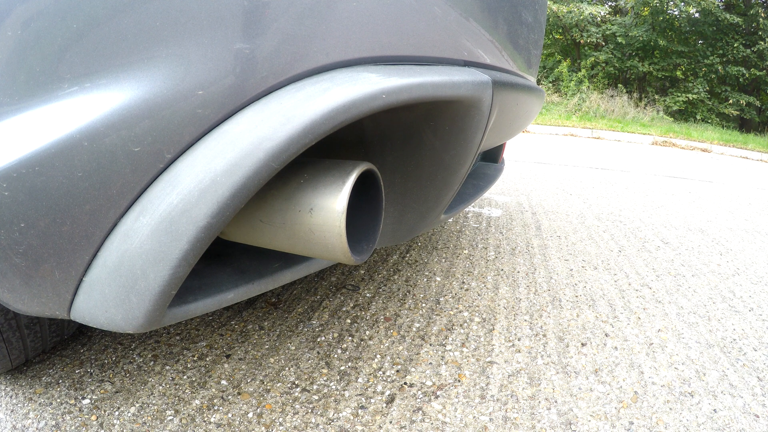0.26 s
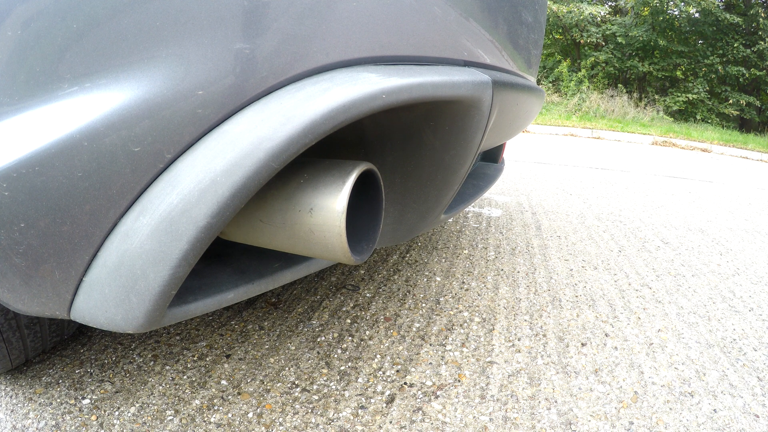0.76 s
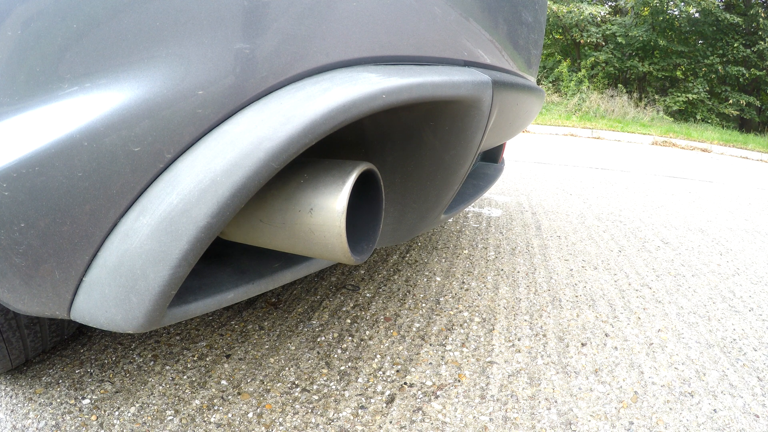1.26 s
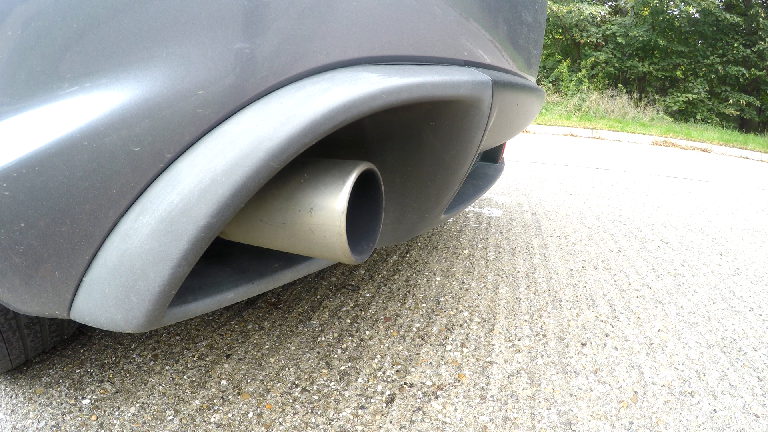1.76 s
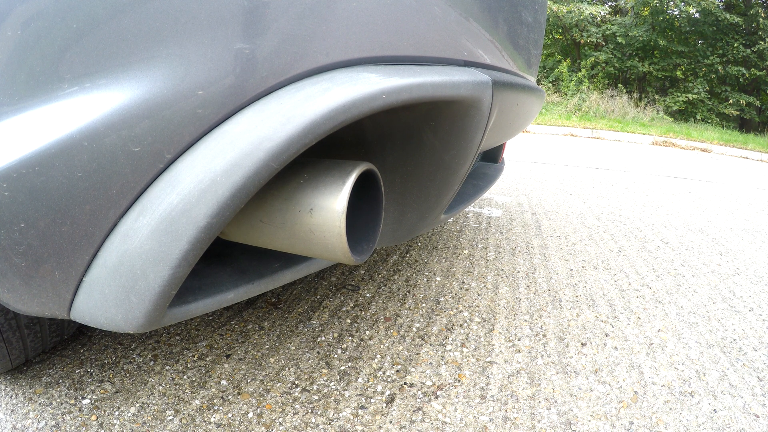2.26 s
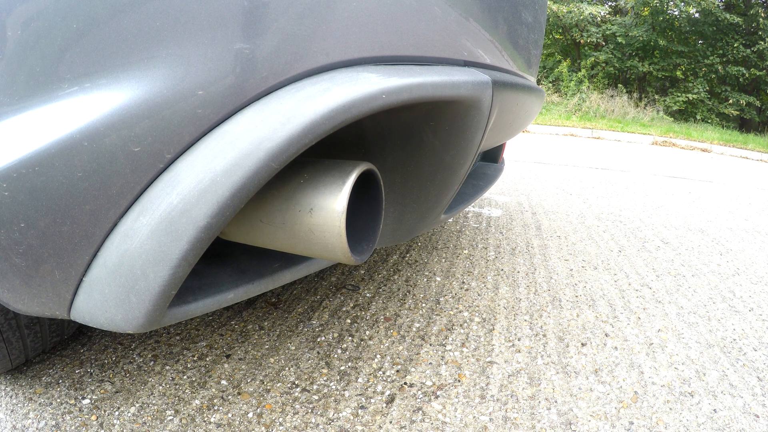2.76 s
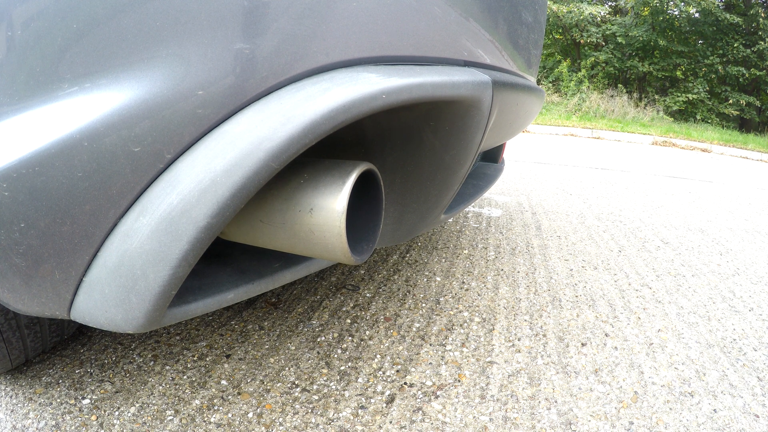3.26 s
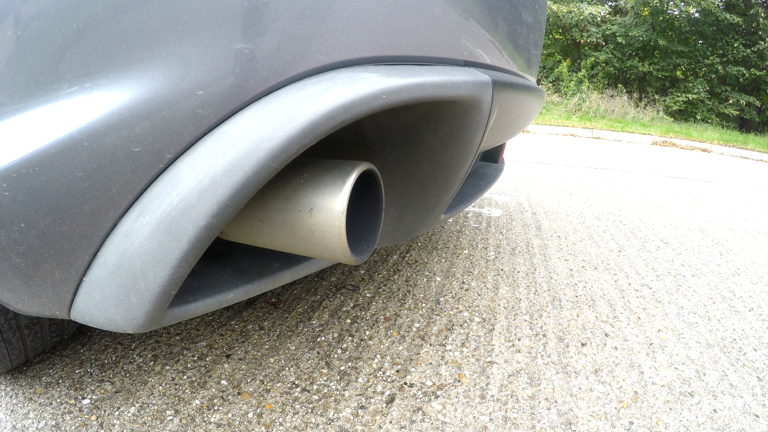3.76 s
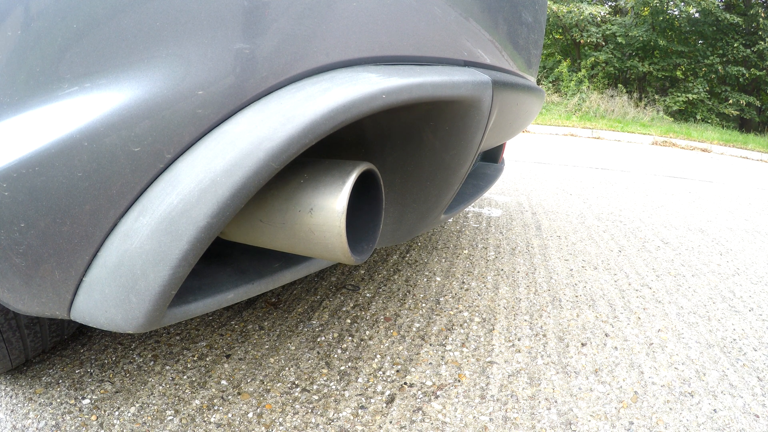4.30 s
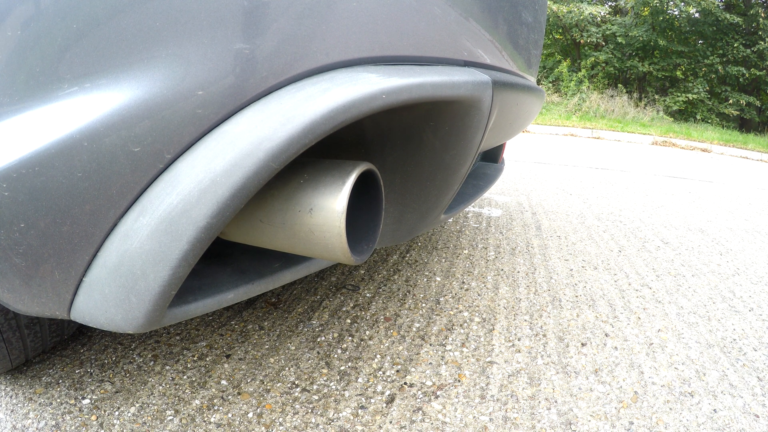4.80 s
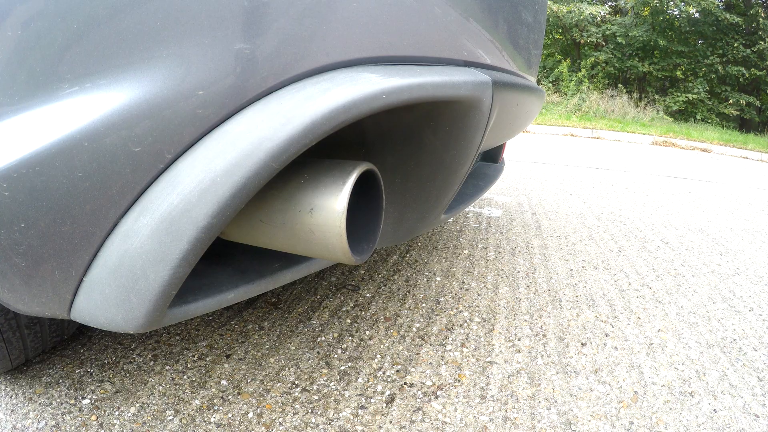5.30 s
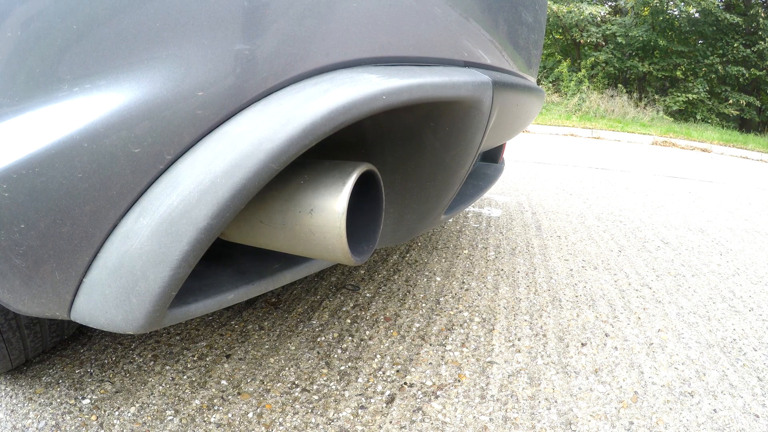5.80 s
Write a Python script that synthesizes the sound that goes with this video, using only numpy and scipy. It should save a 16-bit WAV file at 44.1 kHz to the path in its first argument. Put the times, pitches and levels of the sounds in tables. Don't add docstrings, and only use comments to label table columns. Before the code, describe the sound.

Right beside a car's tailpipe on an open driveway, a deep, uneven idle throbs with small puffs and spits. After just over a second the throttle is blipped: a thump, then a loud raspy bark rising fast. It falls away with a rough, hissing, stuttering overrun and by three seconds settles back to quiet, lumpy idle. Dry, close small-camera microphone.

```python
import sys
import numpy as np
from scipy import signal
from scipy.fft import rfft, irfft, next_fast_len
from scipy.io import wavfile
from scipy.ndimage import uniform_filter1d

SR = 44100
rng = np.random.default_rng(int(sys.argv[2]) if len(sys.argv) > 2 else 0)


def gain_from_decibels(decibels):
    exponent = np.asarray(decibels, float) / 20
    return 10 ** exponent


def wrap_up_sound(samples):
    columns = np.atleast_2d(samples).T
    tamed = np.clip(columns, -1, 1)
    steps = np.round(tamed * 32767).astype(np.int16)
    wavfile.write(sys.argv[1], SR, steps)


N = 266584


def rms_one(x):
    return x / np.sqrt(np.mean(x ** 2) + 1e-20)


def in_time(rows):
    s, *columns = np.transpose(rows)
    return [np.interp(np.arange(N) / SR, s, column) for column in columns]


def at_hz(points, hz):
    point_hz, point_db = np.array(points).T
    return np.interp(np.log(hz), np.log(point_hz), point_db)


def drift(rate_hz):
    r = np.exp(-80 * np.pi * rate_hz / SR)
    noise = rng.standard_normal(N // 40 + 2002)
    slow = signal.lfilter([1], [1, -2 * r, r * r], noise)[2000:]
    return np.interp(np.arange(N) / 40, np.arange(len(slow)), rms_one(slow))


def resonance(x, hz, width_hz):
    r = np.exp(-np.pi * width_hz / SR)
    zeros = np.array([1, 0, -1]) * (1 - r * r) / 2
    poles = [1, -2 * r * np.cos(2 * np.pi * hz / SR), r * r]
    return signal.lfilter(zeros, poles, x + 1e-18)


def coloured_noise(spectrum, patchy_db):
    size = next_fast_len(N)
    hz = np.maximum(np.fft.rfftfreq(size, 1 / SR), 1)
    shaped = rfft(rng.standard_normal(size)) * gain_from_decibels(at_hz(spectrum, hz)) * (hz > 20)
    octave = np.floor(np.log2(hz / 30)).clip(0, 8)
    out = np.zeros(N)
    for k in range(9):
        out += irfft(shaped * (octave == k), size)[:N] * gain_from_decibels(patchy_db * drift(13.6))
    return rms_one(out)


def even(x, span_s):
    return x / np.sqrt(uniform_filter1d(x ** 2, int(span_s * SR)) + 1e-12)


def per_firing(turns, spread_db):
    count = turns.astype(int)
    stronger_db = 2.2 * (-1.) ** count
    return gain_from_decibels(spread_db * rng.standard_normal(400)[count] + stronger_db)


def gas_burst(turns, sharpness):
    phase = turns % 1
    return (1 - np.exp(-phase * 14)) * np.exp(-phase * sharpness)


def humming(hz, width_hz):
    return rms_one(resonance(resonance(rng.standard_normal(N), hz, width_hz), hz, width_hz))


# f/Hz, level/dB [dB per Hz]
BAY_RUSH = [(15, -45), (28, -3), (55, -11), (90, -11.5), (230, -25), (480, -26), (900, -31.5), (1500, -24),
            (2100, -25), (2400, -32), (4200, -33.5), (4700, -38.5), (7000, -43.5), (15000, -50.5)]
# f/Hz, width/Hz, level/dB
CAVITIES = [(199.5, 24, -54.5), (266.4, 9, -55), (337, 43, -61), (412, 30, -62.5)]
# t/s, level/dB
WHISTLE_LEVEL = [(.7, -95), (.8, -69), (.9, -80), (1.1, -68), (1.3, -76), (1.4, -95)]


def machinery():
    rush = gain_from_decibels(-41.5) * coloured_noise(BAY_RUSH, patchy_db=0.5)
    hum = sum(gain_from_decibels(db) * humming(hz, width) for hz, width, db in CAVITIES)
    whistle_db, = in_time(WHISTLE_LEVEL)
    return rush + hum + gain_from_decibels(whistle_db) * humming(8300, 150)


# t/s, length/s, level/dB
SPIT_TIMES = [
    (0.013, 0.021, -42),
    (0.092, 0.024, -42),
    (0.359, 0.051, -44),
    (0.418, 0.016, -31),
    (0.434, 0.017, -35),
    (0.477, 0.012, -48),
]
# f/Hz, level/dB [dB per Hz]
SPIT_COLOUR = [(530, -51), (900, -19), (989, -15), (2150, -5.5), (3100, -15), (3880, 0), (4630, -10.5),
               (8150, -13.5), (15000, -46)]


def spits():
    t, shape = np.arange(N) / SR, np.zeros(N)
    for s, length_s, db in SPIT_TIMES:
        age = np.clip(t - s, 0, 1) / length_s
        shape += gain_from_decibels(db + 4.0) * (1 - np.exp(-6 * age)) * np.exp(-1.5 * age ** 2)
    return shape * coloured_noise(SPIT_COLOUR, patchy_db=2.5)


def unevenness():
    miss_s, refire_s, miss_db = 1.895, 2.106, -9
    rise_s, fall_s, tail_s, tail_db = 0.013, 0.017, 0.12, -8
    loaded_s, loaded_span_s, loaded_db = 1.74, 0.089, -34
    t = np.arange(N) / SR
    after = np.maximum(t - refire_s, 0)
    rise = (1 - np.exp(-np.maximum(t - miss_s, 0) / rise_s)) ** 2
    fall = np.exp(-after / fall_s) + gain_from_decibels(tail_db) * np.exp(-after / tail_s)
    fall = fall / (1 + gain_from_decibels(tail_db))
    loaded = gain_from_decibels(loaded_db) * np.exp(-((t - loaded_s) / loaded_span_s) ** 2)
    return gain_from_decibels(miss_db) * rise * fall + loaded


# multiple [of firing rate], level/dB
HALF_MULTIPLES = [(.5, -2), (1.5, -25.5), (2.5, -36.5), (4.5, -38)]


def misfire(turns):
    angle = 2 * np.pi * (turns - 1.52)
    tones = sum(gain_from_decibels(db) * np.cos(k * angle) for k, db in HALF_MULTIPLES)
    return np.sqrt(2) * unevenness() * tones


def strikes(events, gain_db):
    clicks = np.zeros(N)
    for s, db in events:
        clicks[round(s * SR)] = gain_from_decibels(db + gain_db)
    return clicks


# f/Hz, width/Hz, level/dB
SILENCER_MODES = [(685, 79, 4.5), (694.5, 74, 6), (728, 61, 1), (440, 19, -17), (1220, 123, -2),
                  (1514, 56, 0), (1796, 25, 3.5)]
# t/s, peak level/dB
ROUGH_FIRINGS = [(0.333, -37), (0.373, -39), (0.426, -31.5), (0.443, -34.5), (0.8, -43), (0.949, -35.5),
                 (1.07, -35), (1.311, -37), (1.345, -34), (1.37, -30), (3.204, -41), (3.355, -38),
                 (3.408, -40), (3.46, -40), (3.512, -35.5), (3.566, -33.5), (3.742, -41), (3.989, -36),
                 (4.122, -44), (4.308, -35), (4.386, -39), (4.87, -41), (4.999, -39), (5.065, -37),
                 (5.323, -45), (5.513, -41), (5.576, -39), (5.702, -40), (5.765, -43), (5.959, -50)]
# t/s, peak level/dB
LATE_THUMPS = [
    (.1, -37),
    (0.363, -26),
    (0.417, -33),
    (1.34, -26),
    (1.394, -15.5),
    (2.95, -25),
    (3.569, -27),
    (4.383, -29.5),
]


def knock(turns, knock_db):
    fronts = np.diff(np.floor(turns), prepend=np.floor(turns[0]))
    swirl = 0.087 * rng.standard_normal(N) * gas_burst(turns, sharpness=0.7)
    drive = (fronts + swirl) * per_firing(turns, 2.7)
    rings = np.zeros(N)
    for hz, width, db in SILENCER_MODES:
        rings += gain_from_decibels(db) * resonance(resonance(drive, hz, width), hz, 1.44 * width)
    rough = resonance(resonance(strikes(ROUGH_FIRINGS, 42.5), 712, 86), 670, 220)
    thud = resonance(resonance(strikes(LATE_THUMPS, 40.5), 100, 62), 114, 174)
    return gain_from_decibels(knock_db) * even(rings, 0.089) + rough + thud


# f/Hz, width/Hz, level/dB
TIP_MODES = [(1523, 110, -7.5), (1676, 94, -8), (2230, 69, -2), (2760, 160, -2), (3358, 140, 1.5),
             (3914, 100, 1.5), (4029, 283, -0.5), (4120, 400, -46), (5340, 450, -43)]
# f/Hz, level/dB [dB per Hz]
JET_HISS = [(900, -12), (1300, -2), (2300, 0), (4300, -2), (5000, -8), (5450, -4), (5900, -15), (8000, -11),
            (8600, -16), (9400, -16), (9800, -25), (11000, -18), (12300, -28), (15000, -29)]


def rasp(turns, rasp_db, jet_db, suction):
    burst = gas_burst(turns, sharpness=8.5 - 5.5 * suction) + .06 + .1 * suction
    shock = 2.1 * (1 - suction) * np.diff(np.floor(turns - .06), prepend=0)
    swirl = (rng.standard_normal(N) * burst + shock) * per_firing(turns, 1.3)
    rings = np.zeros(N)
    for hz, width, db in TIP_MODES:
        favour_db = (1.0 + 2.0 * suction) * rng.standard_normal(400)[turns.astype(int)]
        unfired_db = -7 * suction * (hz < 2500)
        driven = swirl * gain_from_decibels(db + favour_db + unfired_db)
        rings += resonance(resonance(driven, hz, width), hz, width)
    jet = coloured_noise(JET_HISS, patchy_db=1.2) * (burst + 1.2) * per_firing(turns, 0.27)
    return gain_from_decibels(rasp_db) * even(rings, 0.11) + gain_from_decibels(jet_db + 6.0) * even(jet, 0.102)


# t/s, level/dB [over calm idle], half length/s
IDLE_LOPE = [(0.2, -12, 0.01), (0.384, 11, 0.018), (0.434, 13, 0.036), (0.5, 4.5, 0.021),
             (0.592, -16, 0.031), (0.712, -4, 0.096), (0.988, 2, 0.043), (1.24, 4, .035),
             (3.002, -3, 0.036), (3.08, 4, .05), (3.27, -11, 0.022), (3.485, -10, 0.077),
             (3.589, 12.5, 0.03), (3.625, 5.5, .04), (3.81, -4.5, 0.063), (3.88, -6, 0.048),
             (4.175, -3, 0.044), (4.425, -5, 0.025), (4.63, 2, 0.033), (4.878, 3.5, 0.093),
             (4.99, -2.5, 0.024), (5.097, 3, 0.051), (5.183, -5, 0.027), (5.31, 1.5, .04),
             (5.45, -4, 0.033), (5.632, 4, 0.07), (5.78, 4.5, 0.056), (5.856, 0, 0.024),
             (6.013, -2.5, 0.043)]


def lope(push_db):
    t = np.arange(N) / SR
    steadied_db = 6
    shake_db = 1.1 * drift(25) * np.exp(-np.maximum(push_db, 0) / steadied_db)
    return shake_db + sum(db * np.exp(-((t - s) / span) ** 2) for s, db, span in IDLE_LOPE)


# f/Hz, level/dB
BOOM_FIRST = [(30, -28.5), (42, -28), (55, -31.5), (85, -39.5)]
# f/Hz, level/dB
BOOM_TWICE = [(62, -41.5), (76, -51.5), (88, -44), (105, -39.5), (160, -48.5), (190, -47.5)]
# f/Hz, level/dB
PIPE_COLOUR = [(95, -4), (125, 0), (165, -15), (195, -6), (230, -20), (265, -15), (320, -23.5),
               (360, -17.5), (420, -18.5), (520, -31), (650, -65)]


def throb(turns, ports, rate, suction, push_db, upper_db):
    lope_db = lope(push_db)
    first_db = push_db + lope_db + at_hz(BOOM_FIRST, rate)
    second_db = push_db + 0.92 * lope_db + at_hz(BOOM_TWICE, 2 * rate)
    upper_db = upper_db + 0.44 * lope_db
    out = gain_from_decibels(first_db) * np.cos(2 * np.pi * turns)
    for k in range(2, 13):
        if k == 2:
            level_db = second_db
        else:
            level_db = upper_db + at_hz(PIPE_COLOUR, k * rate) + 1.15 * drift(4) + 2.26 * drift(32)
        out += gain_from_decibels(level_db) * np.cos(2 * np.pi * k * ports + np.pi * suction)
    return np.sqrt(2) * out


def follow(engine, peak_db, flow_share, push_share, per_octave_db, shut_db):
    rate, flow_db, push_db, suction = engine
    gas_db = flow_share * flow_db + push_share * push_db
    return peak_db + gas_db + per_octave_db * np.log2(rate / 60) + shut_db * suction


# t/s, f/Hz [throbs per s]
ENGINE_SPEED = [(0.0, 50.94), (0.09, 35.96), (0.3, 42.0), (0.51, 32.91), (0.7, 31.98), (1.21, 34.75),
                (1.28, 38.94), (1.44, 37.48), (1.55, 58.83), (1.74, 84.71), (1.8, 86.33), (1.85, 93.82),
                (2.92, 41.0), (2.96, 41.79), (3.81, 34.32), (3.99, 30.83), (4.42, 31.86), (6.04, 31.03)]
# t/s, level/dB [against its peak]
TIP_FLOW = [(0, -24), (.08, -22), (.13, -35), (.18, -42), (1.28, -37.5), (1.33, -33.5), (1.45, -15),
            (1.55, -6), (1.63, 0), (1.78, -10.5), (1.88, -16.5), (1.93, -12.5), (2.09, -17.5), (2.13, -13),
            (2.18, -16.5), (2.75, -20.5), (2.93, -23.5), (2.97, -38)]
# t/s, level/dB [over calm idle]
SLUG_PUSH = [(0, 12), (.115, 15.5), (.16, -1), (1.3, -0.5), (1.345, 6), (1.42, 17), (1.47, 18.5),
             (1.76, 15), (1.88, 6.5), (2.0, 6.5), (2.115, 10.5), (2.96, 12.5), (3.0, -3)]
# t/s, lag [firings], suction [0-1]
PIPE_COLUMN = [
    (0, .62, 0),
    (.13, .62, 0),
    (.25, .35, 0),
    (1.26, .35, 0),
    (1.36, .92, 0),
    (1.8, .92, 0),
    (1.92, 1.45, 1),
    (2.96, 1.45, 1),
    (3.05, 1.35, 0),
]


def scene():
    (rate,), (flow_db,), (push_db,) = in_time(ENGINE_SPEED), in_time(TIP_FLOW), in_time(SLUG_PUSH)
    lag, suction = in_time(PIPE_COLUMN)
    turns = 2.939 + np.cumsum(rate) / SR
    ports = turns - lag

    engine = rate, flow_db, push_db, suction
    knock_db = follow(engine, -30, flow_share=0.5457, push_share=0.2655, per_octave_db=5.5, shut_db=-1)
    rasp_db = follow(engine, -20, flow_share=1.0247, push_share=0.0519, per_octave_db=-0.1, shut_db=.1)
    jet_db = follow(engine, -37, flow_share=0.75, push_share=0.1157, per_octave_db=3, shut_db=-1)
    upper_db = follow(engine, -22, flow_share=0.57, push_share=0.2452, per_octave_db=7.5, shut_db=-3.0)

    mix = machinery() + spits() + misfire(turns)
    mix += knock(ports + 0.105, knock_db)
    mix += rasp(ports + .25 - 0.14 * suction, rasp_db, jet_db, suction)
    mix += throb(turns, ports, rate, suction, push_db, upper_db)
    return mix[None]


def roll_off(x):
    return signal.sosfilt(signal.butter(12, 15180, fs=SR, output="sos"), x)


def record(dry):
    top_cut = signal.ellip(12, .5, 60, 15150, fs=SR, output="sos")
    mix = signal.sosfilt(top_cut, dry)
    return roll_off(mix)


dry = scene()
out = record(dry)
wrap_up_sound(out)
```